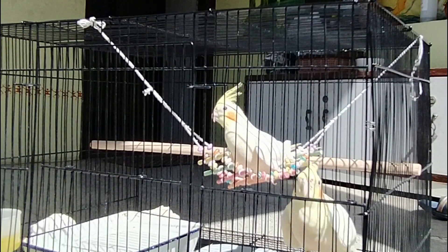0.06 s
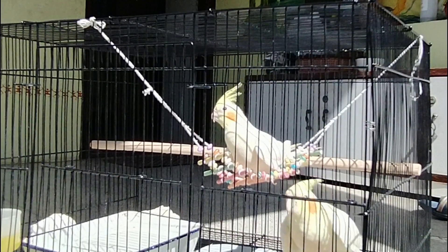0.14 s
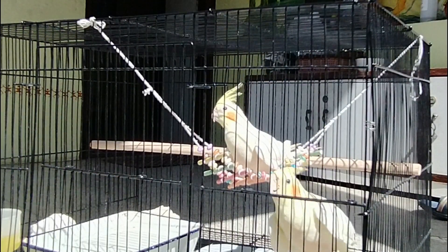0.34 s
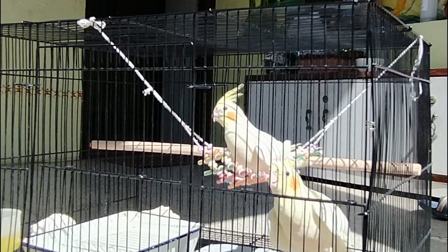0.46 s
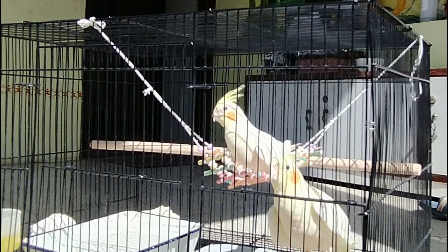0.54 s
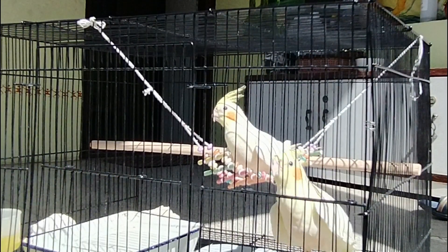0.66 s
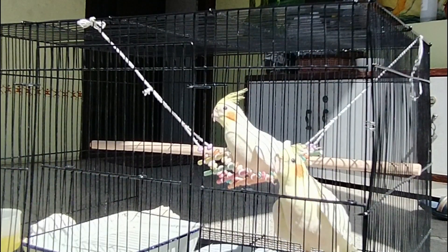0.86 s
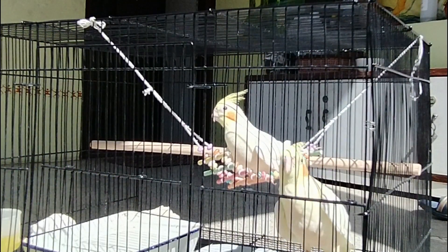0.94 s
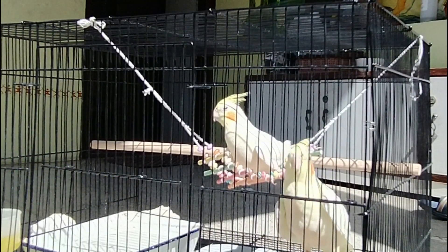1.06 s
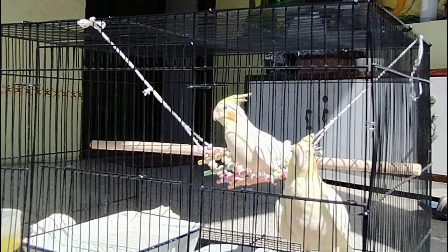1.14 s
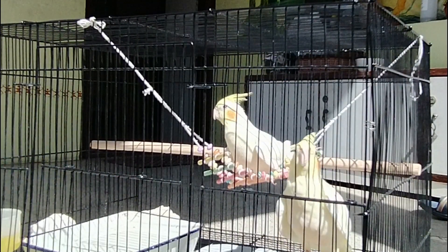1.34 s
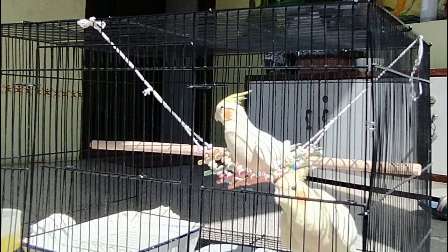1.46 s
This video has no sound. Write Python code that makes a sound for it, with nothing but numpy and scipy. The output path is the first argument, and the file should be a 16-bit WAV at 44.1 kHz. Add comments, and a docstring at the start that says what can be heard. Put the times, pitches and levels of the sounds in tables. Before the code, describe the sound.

A cockatiel gives one loud warbling call from about 0.2 to 0.5 seconds. Its pitch swings upward three times without a break, each time from a buzzy lower note to a pure high one. The hard-walled room rings briefly afterwards, fading by about 1 second. A quiet low rumble, hiss and faint thin whines lie underneath throughout and continue until the end at 1.5 seconds.

```python
"""A hard-walled room: a caged cockatiel gives one loud warbling call.
Its pitch swings three times from a buzzy low note up to a pure high one.
The bird reaches left and right a little apart, and the room rings briefly after it.
Underneath lie a low room rumble, hiss and faint thin whines."""
import sys
import numpy as np
from scipy import signal
from scipy.fft import rfft, irfft
from scipy.io import wavfile
from scipy.ndimage import uniform_filter1d

SR = 44100
rng = np.random.default_rng(int(sys.argv[2]) if len(sys.argv) > 2 else 0)


def dump(signal):
    """Clip the signal to [-1, 1] and save it as 16-bit WAV at the path in sys.argv[1]."""
    limited = np.clip(np.atleast_2d(signal).T, -1, 1)
    pcm = np.round(limited * 32767).astype(np.int16)
    wavfile.write(sys.argv[1], SR, pcm)


N = 66150
BAND_LIMIT_HZ = 15500

# Call contour, one list per swing: t/s, f/Hz, level/dB, overtone gain/dB, flutter depth/0-1
CALL_CONTOURS = [
    [(.224, 1454, -38, 0, 0.42), (.229, 1655, -31.5, 3, 0.42), (.2365, 1679, -31.5, 5, 0.2),
     (.2395, 1913, -26.5, 4, 0.42), (.248, 1960, -30.5, 3.5, 0.42), (.252, 2097, -19.5, 1.5, 0.21),
     (.262, 2158, -27, -4, 0.02), (.266, 2424, -30, 3.5, 0.06), (.273, 2654, -32.5, 3, 0),
     (.2765, 3027, -32, -15, 0), (.281, 3226, -23.5, -6, 0), (.289, 3265, -31, -6, 0.14),
     (.298, 3230, -24, -16, 0), (.303, 2860, -25.5, -14, 0), (.3055, 2460, -30, -13, .05)],
    [(.3065, 2354, -31, 4, 0), (.312, 2181, -17.5, 2, 0.06), (.319, 2096, -22.5, -4.5, 0.12),
     (.335, 2053, -21, -1, 0.11), (.343, 2135, -21, -4, 0.26), (.353, 2214, -21.5, 2.5, 0.02),
     (.358, 2346, -31, 0.5, 0.29), (.366, 2441, -22, -3, 0.26), (.371, 2705, -26, -4, 0.02),
     (.377, 3117, -29, -10, .1), (.387, 3200, -20, -10.5, 0.09), (.398, 3388, -27.5, 1, 0.11),
     (.410, 3187, -25, -12, 0), (.415, 2976, -27.5, -18, 0.14), (.4185, 2550, -20, -14, .05)],
    [(.4195, 2410, -20, 9, .1), (.4225, 2217, -24, -10.5, 0.1), (.432, 2127, -19, -3, 0.18),
     (.443, 2066, -20, -8, 0.2), (.455, 2162, -23, -4.5, 0.22), (.465, 2252, -21, -3.5, 0.34),
     (.470, 2488, -28.5, 4.5, 0), (.477, 2790, -29.5, 5, 0.2), (.4795, 3016, -30, -1, 0.1),
     (.482, 3310, -21, -14, 0.14), (.487, 3423, -18, -21, 0), (.495, 3462, -24.5, -24, 0),
     (.502, 3370, -23, -16, 0.1), (.5045, 3070, -26, -15, 0.14), (.508, 2670, -22.5, -14, .05)],
]
# Per swing: t/s of one flutter dip, flutter f/Hz, tilt/dB per harmonic
SWINGS = [(0.2377, 91.8, 1), (0.33, 97.5, 0), (0.4507, 96.3, -2)]
# Throat and beak response: f/Hz, overtone gain/dB
TRACT_RESPONSE = [(1500, 4), (3200, 2.5), (3900, 4.5), (4300, -5.5), (4700, -2.5), (5300, -1), (5800, -8),
                  (6500, -1.5), (7500, -11.5), (8600, -5), (9400, -9), (10300, -6.5), (12000, -18.5),
                  (14500, -36)]
FLUTTER_PITCH_RATIO, FLUTTER_DB = .11, 23.5  # at depth 1
JITTER_RATIO, SHIMMER_DB, RASP_SHARE, BREATH_DB = 0.0085, 2.5, .25, -35
ONSET_S, RELEASE_S = 0.0022, 0.00132


def cockatiel():
    """One continuous fluttering whistle in three upward swings; throat and beak colour its overtones."""
    out = np.zeros(N)
    for contour, (dip_s, flutter_hz, tilt_db) in zip(CALL_CONTOURS, SWINGS):
        times, *columns = np.transpose(contour)
        t = np.arange(times[0], times[-1], 1 / SR)
        n = len(t)
        hz, db, overtone_db, depth = (uniform_filter1d(np.interp(t, times, c), 60) for c in columns)
        flutter_phase = 2 * np.pi * flutter_hz * (t - dip_s)
        flutter_db = FLUTTER_DB * depth * (abs(np.sin(flutter_phase / 2)) - 2 / np.pi)
        vibrato = FLUTTER_PITCH_RATIO * depth * np.sin(flutter_phase)
        hz = hz * (1 + vibrato + JITTER_RATIO * wander(n, 0.003))
        phase = 2 * np.pi * np.cumsum(hz) / SR
        overtones = np.zeros(n)
        for k in range(2, 9):
            colour_db = at_hz(TRACT_RESPONSE, k * hz) + tilt_db * (k - 3)
            gain = amp(colour_db + SHIMMER_DB * wander(n, 0.0038)) * (k * hz < BAND_LIMIT_HZ)
            rasp = 1 - RASP_SHARE + RASP_SHARE * wander(n, 0.001)
            overtones += gain * rasp * np.sin(k * phase)
        breath = amp(BREATH_DB) * wander(n, 0.00015) * np.sin(phase)
        gate = np.clip((t - times[0]) / ONSET_S, 0, 1) * np.clip((times[-1] - t) / RELEASE_S, 0, 1)
        voice = np.sqrt(2) * (np.sin(phase) + breath + amp(overtone_db) * overtones)
        out[round(times[0] * SR):][:n] += gate * amp(db + flutter_db) * voice
    return out


# Left minus right: f/Hz, level/dB
BALANCE = [(1600, 0), (2200, 3.5), (3300, 0.5), (4400, 0.5), (8500, -1), (13000, 4)]
# Left behind right: f/Hz, phase/rad
LEFT_LAG = [(1500, 0.51), (2200, 0.75), (3300, 1.03), (4300, 2.12), (6500, 1.96), (8600, 1.5),
            (12000, 1.93)]


def direct_path(bird):
    """The bird arrives on each side with its own level and lag at each frequency."""
    hz = np.fft.rfftfreq(N, 1 / SR)
    left_gain = amp(at_hz(BALANCE, hz) / 2) * np.exp(-.5j * at_hz(LEFT_LAG, hz))
    return irfft(rfft(bird) * np.array([left_gain, 1 / left_gain]), N)


# Early echoes: delay/s, left level/dB, right level/dB
ECHOES = [(.0021, -20, -21), (.0047, -17.5, -12.5), (.0083, -34, -14.5), (.0125, -19.5, -13.5),
          (.019, -15, -17.5)]
# Room decay: f/Hz, T60/s
ROOM_DECAY = [(1500, 0.21), (2200, 0.62), (3400, 0.51), (5000, 0.53), (8000, 0.36), (12000, 0.19)]
# The walls get more treble than the direct path: f/Hz, gain/dB
ROOM_COLOUR = [(1500, -2), (2200, 1), (3400, -1), (4500, 2), (6500, 3.5), (9000, 3.5), (12000, 1.5)]
TAIL_DB, SCATTER_DB, SCATTER_T60_S = -16.5, -14, 0.17  # levels before ROOM_COLOUR


def room(bird):
    """Early echoes, quick scatter off cage and near walls, and a tail decaying band by band."""
    taps = np.zeros((2, SR))
    arrivals = np.arange(200, SR - 20, 20) + rng.integers(0, 20, (2, (SR - 201) // 20))
    np.put_along_axis(taps, arrivals, rng.choice([-1., 1.], arrivals.shape), 1)
    hz, t, spectra = signal.stft(taps, SR, nperseg=256)
    decay = amp(-60 * t / at_hz(ROOM_DECAY, hz)[:, None])
    tail = signal.istft(spectra * decay, SR, nperseg=256)[1]
    tail = tail[:, :SR] * amp(TAIL_DB) / np.linalg.norm(tail[0])
    scatter = taps * amp(-60 * np.arange(SR) / SR / SCATTER_T60_S)
    scatter *= amp(SCATTER_DB) / np.linalg.norm(scatter[0])
    colour = amp(at_hz(ROOM_COLOUR, np.fft.rfftfreq(SR, 1 / SR)))
    response = irfft(rfft(tail + scatter) * colour, SR)
    for delay_s, left_db, right_db in ECHOES:
        response[:, round(delay_s * SR)] += amp([left_db, right_db])
    return signal.fftconvolve(bird[None], response, axes=1)[:, :N]


# Noise spectra: f/Hz, relative density/dB
RUMBLE_SPECTRUM = [(12, -58), (20, -11), (27, -23), (59, 4), (97, -8.5), (171, -1), (209, -9.5),
                   (286, -7.5), (325, -7), (356, -10), (741, -16), (1600, -23), (2080, -16), (3520, -120)]
HISS_SPECTRUM = [(710, -9), (1200, -5.5), (1760, -9.5), (2210, -1.5), (3180, -5), (4240, -8.5), (5420, -8),
                 (7200, -7.5), (8960, -2.5), (9870, -3), (11300, -7), (12300, -16), (14000, -23.5),
                 (15500, -30)]
# Noise envelopes: t/s, level/dB
RUMBLE_LEVEL = [(0, -51.5), (.5, -51), (.9, -49.5), (1.2, -51), (1.5, -50)]
HISS_LEVEL = [(0, -50), (.2, -51), (.6, -54), (.9, -55.5), (1.2, -57.5), (1.5, -56)]
# Stereo width of the noise: f/Hz, left-right correlation
CORRELATION = [(60, 0.77), (130, 1), (290, 0.79), (640, 0.12), (1410, -0.3), (3100, -0.099), (6820, -0.075),
               (15000, -0.25)]
PATCH_DB = 2


def rumble_and_hiss():
    """Two layers of room noise, each with drifting spectral patches and a slowly moving level."""
    out = np.zeros((2, N))
    frames, hz = N // 256 + 5, np.fft.rfftfreq(1024, 1 / SR)
    correlation = np.clip(at_hz(CORRELATION, hz), -1, 1)[:, None]
    for spectrum, envelope in (RUMBLE_SPECTRUM, RUMBLE_LEVEL), (HISS_SPECTRUM, HISS_LEVEL):
        left_re, left_im, other_re, other_im, patches = rng.standard_normal((frames, 513, 5)).T
        left = left_re + 1j * left_im
        right = correlation * left + np.sqrt(1 - correlation ** 2) * (other_re + 1j * other_im)
        patches = unit_rms(uniform_filter1d(uniform_filter1d(patches, 10, axis=0), 12, axis=1))
        colour = amp(at_hz(spectrum, hz)[:, None] + PATCH_DB * patches)
        noise = signal.istft(np.array([left, right]) * colour, nperseg=1024, noverlap=768)[1][:, :N]
        out += amp(over_time(envelope)) * noise / np.std(noise.mean(0))
    return out


# Whines: f/Hz, rms wobble/Hz, [(t/s, level/dB)]
WHINES = [(4056, 6.4, [(0, -70), (.2, -61.5), (.6, -70), (1.1, -74), (1.3, -69), (1.44, -62.5),
          (1.5, -70)]), (9620, 6.9, [(0, -64), (.1, -62), (.2, -58), (.7, -70), (.84, -62), (1., -74),
          (1.17, -70), (1.24, -59.5), (1.31, -68.5), (1.44, -57), (1.5, -77)]), (1385, 3.3, [(.03, -69.5),
          (.08, -60.5), (.16, -70.5), (.19, -90)]), (99.6, 3.4, [(0, -54), (.35, -57.5), (.75, -58),
          (1., -66.5), (1.5, -69)])]
WAVER_DB = 3.5


def whines():
    """Faint thin tones, probably household machines, wavering in pitch and level."""
    out = np.zeros((2, N))
    for hz, wobble_hz, envelope in WHINES:
        phase = 2 * np.pi * np.cumsum(hz + wobble_hz * wander(N, 0.018)) / SR
        db = over_time(envelope) + WAVER_DB * wander(N, 0.04)
        out += np.sqrt(2) * amp(db) * np.sin(phase)
    return out


def amp(db):
    return 10 ** (np.asarray(db) / 20)


def unit_rms(x):
    return x / np.sqrt(np.mean(x ** 2) + 1e-20)


def at_hz(points, hz):
    """Interpolate on a log frequency axis."""
    f, value = np.transpose(points)
    return np.interp(np.log(hz + 1), np.log(f + 1), value)


def over_time(points):
    return np.interp(np.arange(N) / SR, *np.transpose(points))


def wander(count, smooth_s):
    """Smooth random drift of rms 1."""
    size = max(int(smooth_s * SR), 1)
    return unit_rms(uniform_filter1d(uniform_filter1d(rng.standard_normal(count), size), size))


def scene():
    bird = cockatiel()
    return direct_path(bird) + room(bird) + rumble_and_hiss() + whines()


def record(dry):
    """Low-pass at the band limit."""
    lowpass = signal.firwin(511, BAND_LIMIT_HZ, window=("kaiser", 9), fs=SR)
    return signal.oaconvolve(dry, lowpass[None], "same")


dry = scene()
out = record(dry)
dump(out)
```